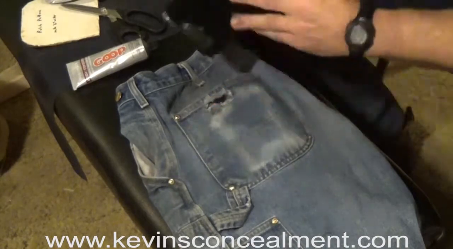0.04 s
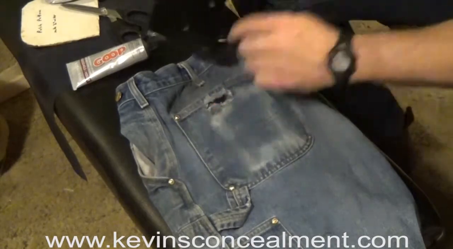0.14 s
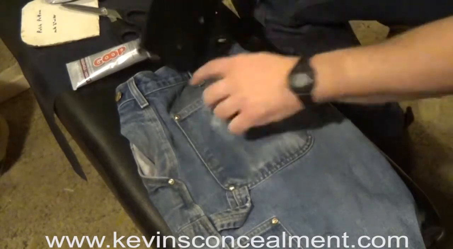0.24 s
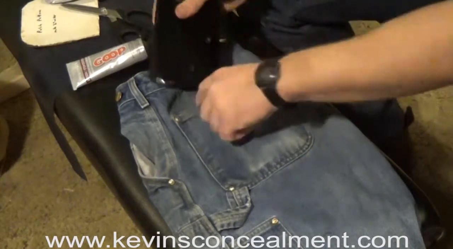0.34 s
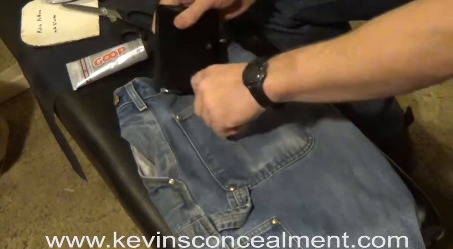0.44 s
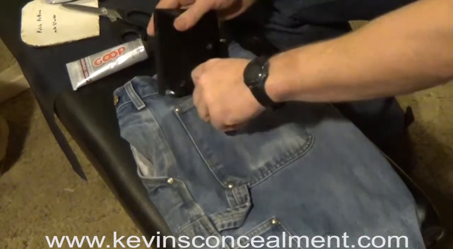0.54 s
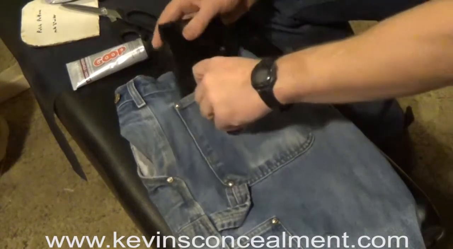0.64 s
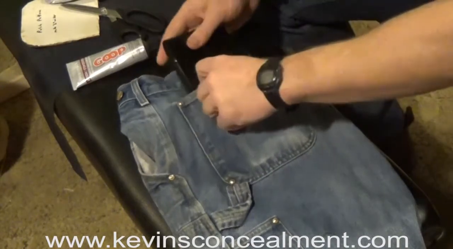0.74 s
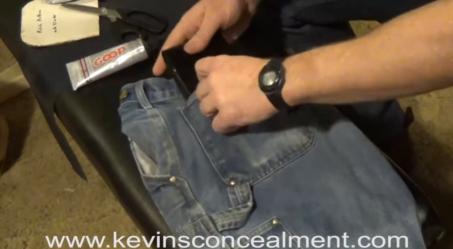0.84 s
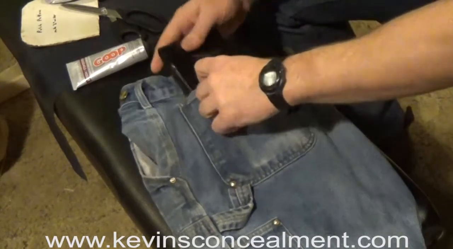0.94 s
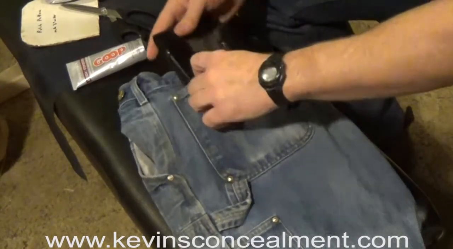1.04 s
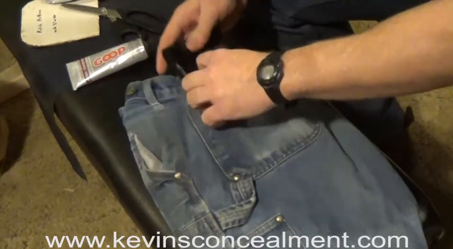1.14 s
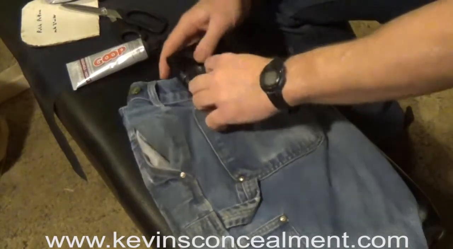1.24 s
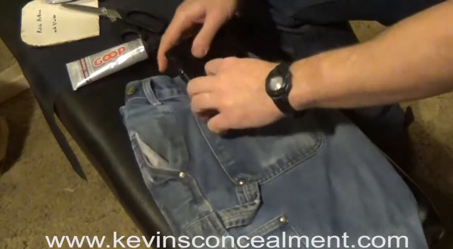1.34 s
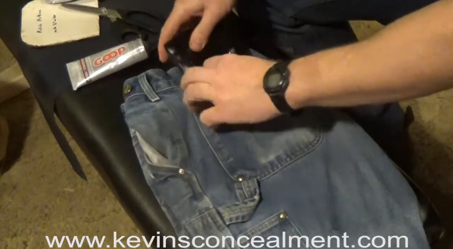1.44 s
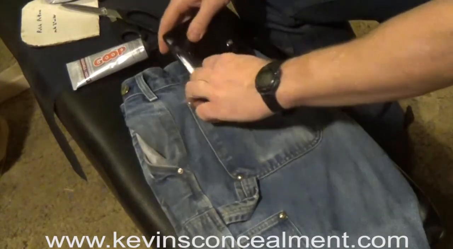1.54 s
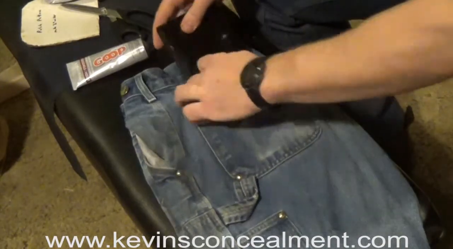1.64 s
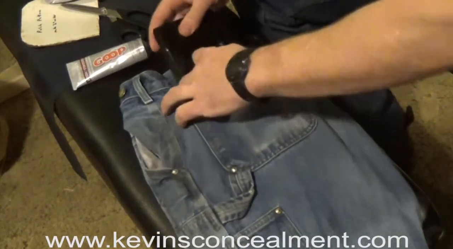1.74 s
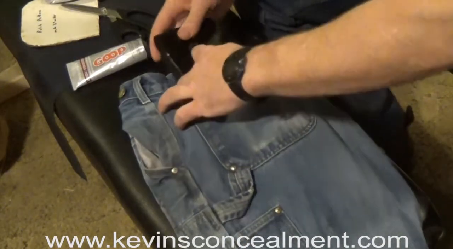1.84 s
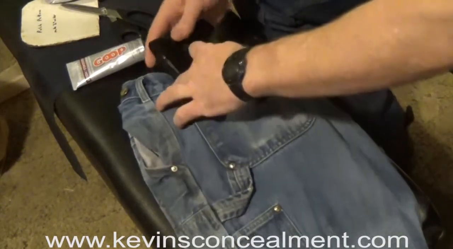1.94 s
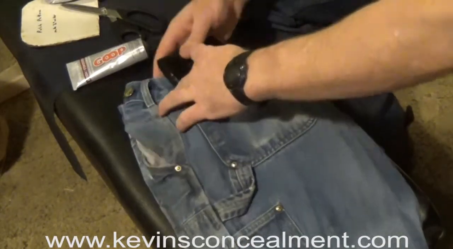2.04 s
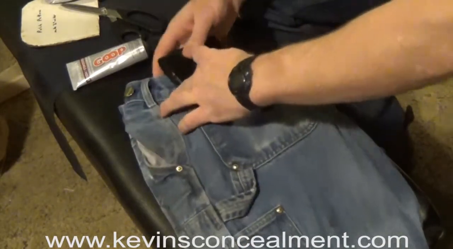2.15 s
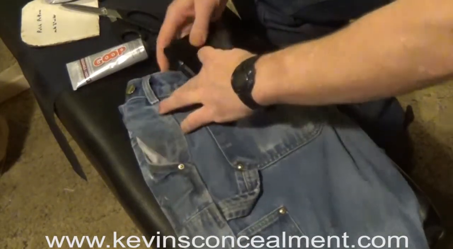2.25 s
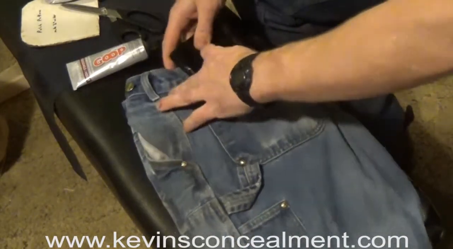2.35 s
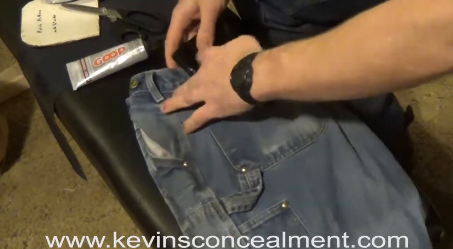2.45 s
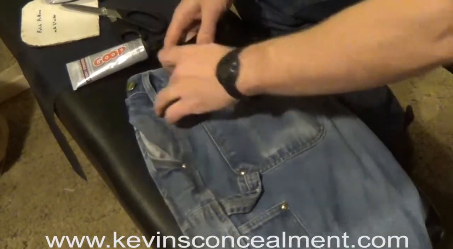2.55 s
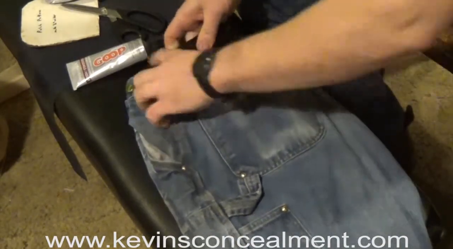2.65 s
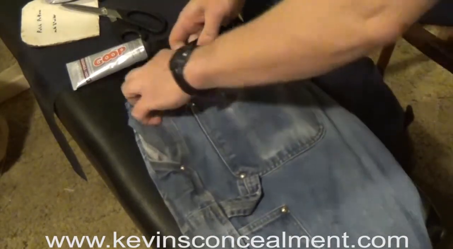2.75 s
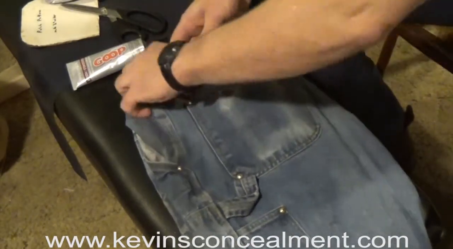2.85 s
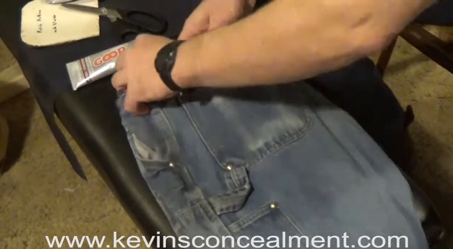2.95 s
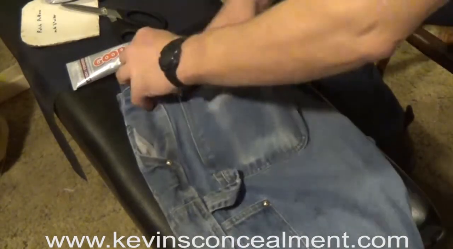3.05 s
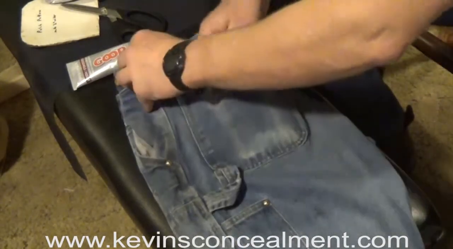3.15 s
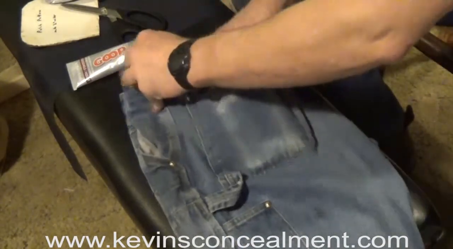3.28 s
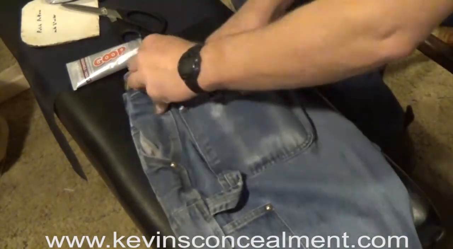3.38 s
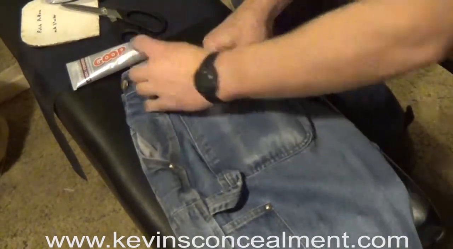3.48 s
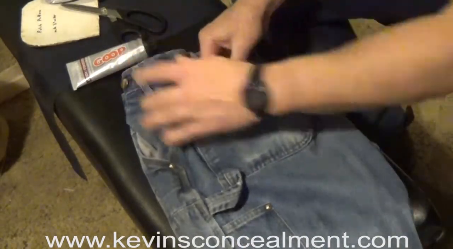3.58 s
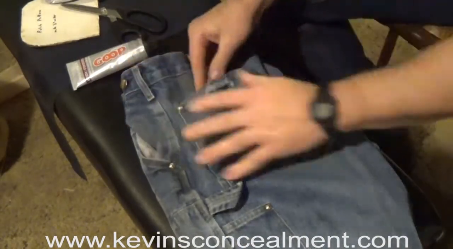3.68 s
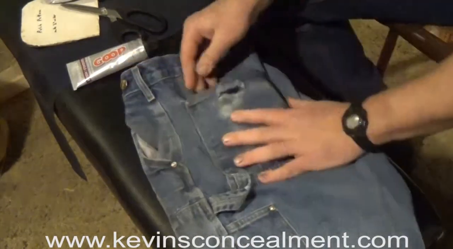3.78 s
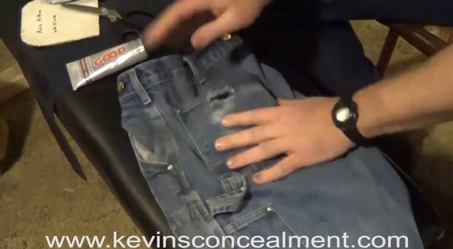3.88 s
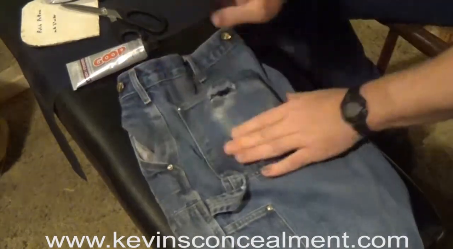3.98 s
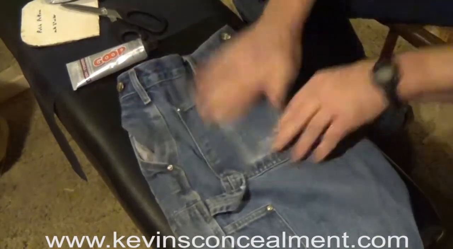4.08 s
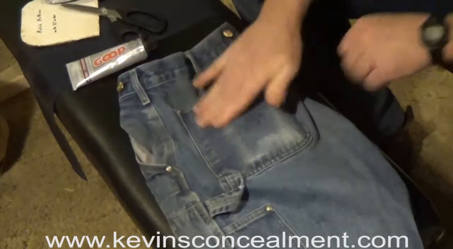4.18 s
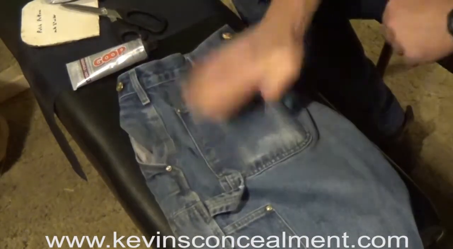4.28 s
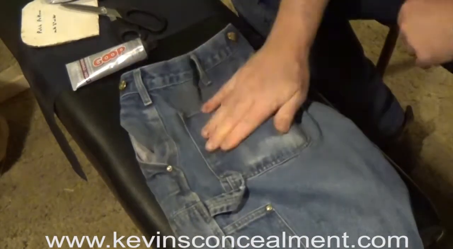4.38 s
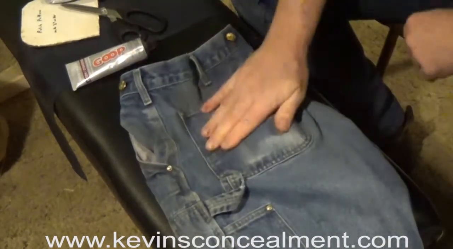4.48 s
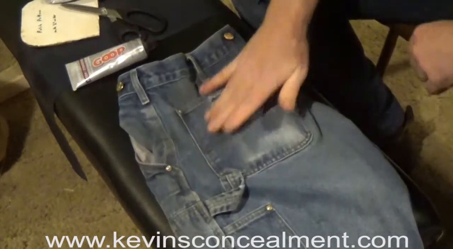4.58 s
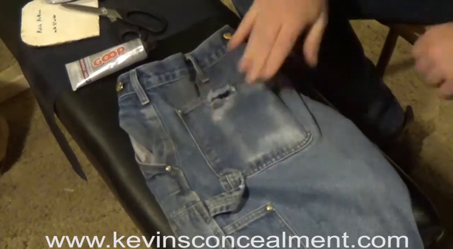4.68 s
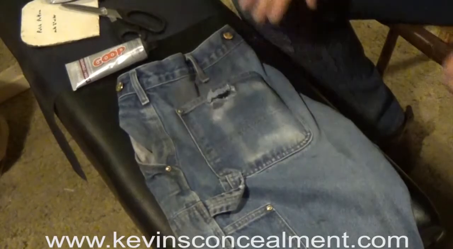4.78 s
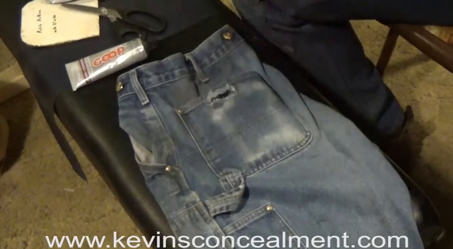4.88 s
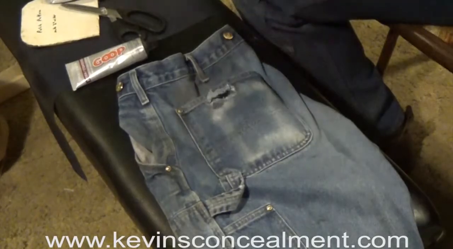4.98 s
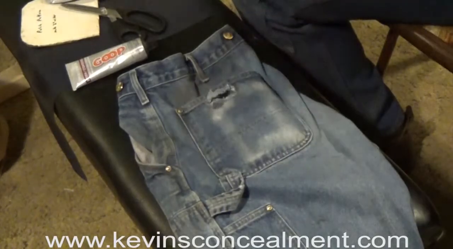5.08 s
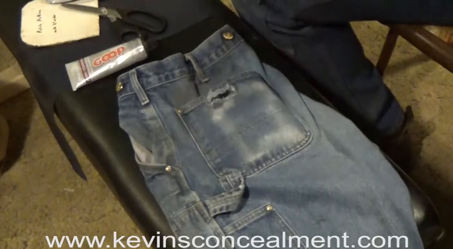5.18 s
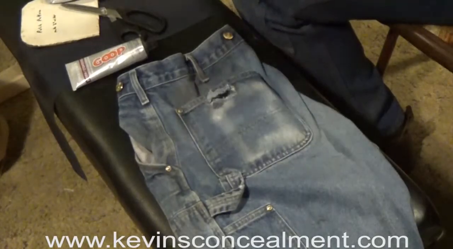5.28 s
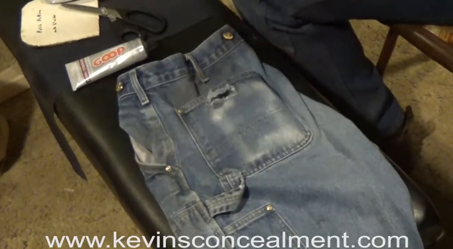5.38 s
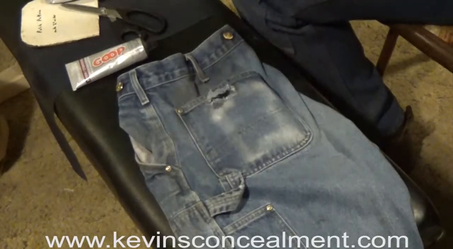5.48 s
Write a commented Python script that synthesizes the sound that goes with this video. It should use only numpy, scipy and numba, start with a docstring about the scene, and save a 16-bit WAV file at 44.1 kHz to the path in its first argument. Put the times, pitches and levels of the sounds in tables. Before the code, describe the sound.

Close up in a small, quiet room, denim rustles in short, uneven pushes while a leather holster knocks lightly and creaks as it is worked into place. A sudden snap follows, then two loud, quick palm pats on the fabric. A soft swish of skin over cloth and a couple of faint taps finish it, over low room hiss.

```python
"""Holster into a waistband

Hands work a leather holster into jeans lying on a padded table, close to a camcorder in a small room.
Denim rubs and crinkles, leather taps and creaks; the holster snaps into place, then a flat hand pats
the cloth twice and brushes away. The room rings briefly over a faint drone and hiss."""
import sys
import numpy as np
from scipy import signal
from scipy.fft import rfft, irfft, next_fast_len
from scipy.io import wavfile
from scipy.ndimage import uniform_filter1d, minimum_filter1d
from numba import njit

SR = 44100
rng = np.random.default_rng(int(sys.argv[2]) if len(sys.argv) > 2 else 0)


def dump(signal):
    """Clip the signal to [-1, 1] and save it as 16-bit WAV at the path in sys.argv[1]."""
    limited = np.clip(np.atleast_2d(signal).T, -1, 1)
    pcm = np.round(limited * 32767).astype(np.int16)
    wavfile.write(sys.argv[1], SR, pcm)


N = 243541
TIME = np.arange(N) / SR

# dull rub of denim folds: f/Hz, level/dB
FOLD_SPECTRUM = [(30, -34), (100, -31), (220, -4), (380, 0.5), (700, 5), (1500, 2.5), (2500, -4.5),
                 (4500, -6.5), (10000, -67.5)]
# bright hiss of the weave: f/Hz, level/dB
WEAVE_SPECTRUM = [(200, -53), (700, -3.5), (1500, 2.5), (3400, 3.5), (6600, 0.5), (7800, -7), (11000, -9),
                  (15500, -22)]


def undb(db):
    """Decibels to gain."""
    return 10 ** (np.asarray(db) / 20)


def unit_rms(x):
    """Scale to rms 1."""
    return x / np.sqrt(np.mean(x ** 2))


def unit_energy(x):
    """Scale to energy 1."""
    return x / np.sqrt(np.sum(x ** 2))


def at_hz(points, hz):
    """Read (f/Hz, value) points on a log-frequency axis."""
    f, value = np.transpose(points)
    return np.interp(np.log(np.maximum(hz, 1)), np.log(f), value)


def colour(x, points):
    """Minimum-phase EQ through (f/Hz, level/dB) points; white noise keeps its level."""
    size = 4096
    gain = undb(at_hz(points, np.fft.rfftfreq(size, 1 / SR)))
    cepstrum = irfft(np.log(gain))
    cepstrum[1:size // 2] *= 2
    cepstrum[size // 2 + 1:] = 0
    impulse = unit_energy(irfft(np.exp(rfft(cepstrum))))
    return signal.fftconvolve(x, impulse)[:len(x)]


def resonate(x, hz, q):
    """One band-pass resonance."""
    return signal.lfilter(*signal.iirpeak(hz, q, fs=SR), x)


def fade(t, t60):
    """Exponential decay by 60 dB in t60."""
    return np.exp(-np.log(1000) * t / t60)


def wander(rate):
    """Random drift that heads for a new value `rate` times a second."""
    knots = rng.standard_normal(4096)
    return 1.61 * np.interp(TIME * rate, np.arange(len(knots)), knots)


def add(track, start_s, sound):
    """Mix a sound into a track."""
    start = int(start_s * SR)
    track[start:start + len(sound)] += sound[:N - start]


def fibres(rate, spread_db):
    """Tiny slips of threads over each other: many small, a few large."""
    slips = rng.random(N) < rate / SR
    sizes = undb(spread_db * np.minimum(rng.exponential(size=N), 5))
    return unit_rms(slips * sizes * rng.choice([-1, 1], N))


def snap(t, t60):
    """A short burst of slips with an even spectrum; energy 1."""
    spectrum = rfft(rng.standard_normal(len(t)) * fade(t, t60))
    whitened = irfft(spectrum / np.abs(spectrum), len(t))
    return unit_energy(whitened * fade(t, 2 * t60))


def room_tone():
    """Steady air and hiss as mid and side; a faint, wavering drone comes in near the end."""
    # still air of the room: f/Hz, level/dB
    air_spectrum = [(25, -16), (50, -30), (80, -0.5), (130, -7.5), (250, -3.5), (335, 3.5), (450, -2.5),
                    (680, -2.5), (1400, -8), (3500, -8.5), (4500, -12.5), (6300, -12.5), (8500, -16.5),
                    (15500, -22.5)]
    # swell of the drone: t/s, level/dB
    drone_swell = [(4.4, -92), (4.62, -73), (5.1, -73), (5.4, -79)]
    mid, side = (undb(-61.5) * colour(rng.standard_normal(N), air_spectrum) for _ in range(2))
    drone_hz = 145 + 2.37 * wander(rate=6.5)
    drone_db = np.interp(TIME, *np.transpose(drone_swell)) + wander(rate=16)
    drone = unit_rms(np.sin(2 * np.pi * np.cumsum(drone_hz) / SR)) * undb(drone_db)
    return mid + drone, 1.4 * side


def reflections():
    """Impulse response of near walls: dense echoes, with the bass lasting longest."""
    # room decay: f/Hz, t60/s
    decay_times = [(150, 0.45), (400, 0.25), (1000, 0.28), (2700, 0.25), (7000, 0.17), (14000, 0.21)]
    t = np.arange(SR // 2) / SR
    noise_spectrum = rfft(rng.standard_normal(len(t)))
    hz = np.fft.rfftfreq(len(t), 1 / SR)
    centres = np.geomspace(125, 16000, 8)
    tail = 0
    for centre, band in zip(centres, np.eye(len(centres))):
        share = at_hz(np.c_[centres, band], hz)
        octave = irfft(noise_spectrum * share, len(t))
        tail = tail + octave * fade(t, at_hz(decay_times, centre))
    onset = np.clip((t - .002) / .0026, 0, 1)
    return unit_energy(tail * onset)


def echoes(dry):
    """The point of contact wanders over the cloth, so the sound passes between two echo patterns."""
    place = 2 * np.pi * 14 * TIME + wander(rate=20)
    shares = np.cos(place), np.sin(place)
    return sum(signal.fftconvolve(dry * share, reflections())[:N] for share in shares)


def room(dry):
    """Mid and side at the microphone: the hands a little to the right, the echoes from all round."""
    # resonances of table and room: f/Hz, level/dB
    modes = [(240, 1.5), (414, 6), (496, -6.5), (610, -2), (690, 4), (964, 2.5)]
    t = np.arange(SR // 2) / SR
    ring = sum(undb(db) * np.cos(2 * np.pi * hz * t) for hz, db in modes) * fade(t, t60=.21)
    mid = .75 * dry + undb(-61) * signal.fftconvolve(dry, ring)[:N]
    # sound reaches the right port first, so part of the side signal lags by a quarter cycle
    lagging = signal.hilbert(mid, next_fast_len(N))[:N].imag
    side = lagging - .45 * mid
    return mid + undb(-9.5) * echoes(dry), side + undb(-7.5) * echoes(dry)


def stroke_speed(peak_s, rise, fall):
    """One push of the cloth gathers and dies away: 7.5 dB down at one rise or fall time from its peak."""
    away = np.maximum((peak_s - TIME) / rise, (TIME - peak_s) / fall)
    return undb(-7.5 * np.minimum(away, 10) ** 1.75)  # exponent 1 = pointed, 2 = bell


def denim_rustle():
    """Folds catch and let go in coarse slips, while the weave gives a fine hiss."""
    # pushes and pulls of the cloth: peak t/s, rise/s, fall/s, fold rub/dB, weave hiss/dB
    strokes = [ (0.005, 0.022, 0.023, -43, -47), (0.065, 0.056, 0.076, -58, -47),
               (0.43, 0.067, 0.075, -62, -60), (0.735, 0.04, 0.048, -49.5, -53.5),
               (0.84, 0.084, 0.12, -61.5, -59), (1.02, 0.042, 0.057, -54.5, -59),
               (1.135, 0.014, .03, -54, -54), (1.255, 0.062, 0.015, -53.5, -74),
               (1.42, 0.13, 0.081, -56.5, -58), (1.7, 0.16, 0.078, -56, -67),
               (1.885, 0.018, 0.04, -46.5, -54), (2.085, 0.065, 0.015, -51, -58.5),
               (2.198, .008, .04, -47.5, -60), (2.315, 0.077, 0.067, -52.5, -56),
               (2.485, 0.043, 0.11, -58, -57), (2.655, 0.066, 0.053, -56, -62),
               (2.815, 0.081, 0.031, -60.5, -57.5), (2.96, 0.084, .07, -51.5, -55.5),
               (3.055, 0.05, 0.062, -46.5, -52), (3.18, 0.035, 0.04, -56.5, -57.5),
               (3.335, 0.039, 0.038, -48, -50), (3.41, 0.026, 0.065, -56.5, -68),
               (3.521, 0.035, 0.022, -58, -56.5), (3.68, 0.089, 0.037, -56, -56),
               (4.01, 0.04, 0.12, -64.5, -57.5), (4.141, 0.046, 0.022, -66, -47)]
    # hands resting on the cloth never keep quite still, until they let go at 3.75 s
    holding = np.clip((3.75 - TIME) / .1, 0, 1)
    rub_power = (holding * undb(-68)) ** 2
    hiss_power = (holding * undb(-66.5)) ** 2
    for peak_s, rise, fall, rub_db, hiss_db in strokes:
        speed = stroke_speed(peak_s, rise, fall)
        rub_power += (speed * undb(rub_db)) ** 2
        hiss_power += (speed * undb(hiss_db)) ** 2
    grip = undb(.88 * wander(rate=79))
    folds = colour(fibres(rate=1500, spread_db=3), FOLD_SPECTRUM) * np.sqrt(rub_power)
    weave = colour(fibres(rate=5000, spread_db=4), WEAVE_SPECTRUM) * np.sqrt(hiss_power)
    return grip * (folds + weave)


def hand_brushes():
    """Skin skims the weave: a smooth hiss that swells and fades with the speed of the hand."""
    # light sweeps over the cloth: t/s, length/s, hiss centre/Hz, level/dB
    sweeps = [(0.266, 0.069, 8800, -56), (1.106, 0.055, 8000, -56), (4.519, 0.39, 4620, -64),
              (4.84, 0.17, 5170, -56.5), (4.952, 0.091, 4660, -46), (4.989, 0.091, 5000, -54.5),
              (5.33, 0.055, 3500, -62.5)]
    out = np.zeros(N)
    for start_s, length, hz, db in sweeps:
        speed = np.hanning(int(length * SR))
        threads = colour(rng.standard_normal(SR // 2), WEAVE_SPECTRUM)
        hiss = resonate(threads, hz, q=.61)[-len(speed):]
        add(out, start_s, undb(db) * unit_rms(speed * hiss))
    return out


def leather_creaks():
    """Leather sticks and slips for a moment in a narrow, unsteady squeak."""
    # creaks of leather and skin: t/s, length/s, f/Hz, level/dB
    creaks = [(0, 0.021, 1170, -43.5), (0, 0.024, 3020, -46), (0.065, 0.022, 1390, -49),
              (0.107, 0.029, 5670, -54.5), (1.67, 0.016, 4030, -56), (1.869, 0.0065, 4370, -41.5),
              (1.916, 0.014, 6070, -55), (2.638, 0.01, 1570, -43.5), (4.122, 0.03, 2340, -46.5)]
    out = np.zeros(N)
    for start_s, length, hz, db in creaks:
        swell = np.hanning(int(length * SR))
        friction = rng.standard_normal(SR // 8)
        squeak = resonate(resonate(friction, hz, q=4), hz, q=4)[-len(swell):]
        add(out, start_s, undb(db) * unit_rms(swell * squeak))
    return out


def leather_taps():
    """Each touch is a short scuff that excites a damped knock of the leather, with a cloth tick on top."""
    # light touches of leather and fingers: t/s, level/dB, knock f/Hz, tick re knock/dB, scuff t60/s
    touches = [ (0.042, -22, 1450, -9, .02), (0.068, -10.5, 1310, -3, 0.041), (0.551, -34, 1320, -7, 0.015),
               (0.733, -24.5, 725, -16, 0.05), (0.748, -35.5, 716, -3.5, 0.034),
               (1.2405, -27.5, 626, -12, 0.017), (1.393, -24, 604, -11, 0.063),
               (1.633, -26.5, 1410, -11, .01), (1.711, -26.5, 426, -2, .05),
               (1.873, -23, 2480, -0.5, 0.043), (1.882, -23.5, 1410, -25, 0.025),
               (2.034, -21, 1390, -2, 0.049), (2.081, -27, 745, -22, 0.035),
               (2.1932, -20.5, 1700, -10, 0.014), (2.248, -28.5, 1210, -7, 0.017),
               (2.308, -24, 640, -8, 0.048), (2.64, -23.5, 940, -10, 0.018),
               (3.023, -21.5, 1400, -12, 0.05), (3.052, -18.5, 1910, -12, 0.015),
               (3.069, -26, 910, -16, 0.015), (3.084, -23, 666, -4, 0.085), (3.289, -25.5, 795, -9, 0.059),
               (3.313, -19, 600, -18, 0.14), (3.333, -17.5, 1010, -4, 0.019),
               (3.785, -21.5, 1400, -6, 0.072), (4.086, -30, 5000, -10, .013),
               (5.332, -31.5, 593, -23, 0.1), (5.461, -31, 1000, -17, 0.062)]
    out, t = np.zeros(N), np.arange(SR // 8) / SR
    for start_s, db, hz, tick_db, t60 in touches:
        scuff = snap(t, t60)
        knock = unit_energy(resonate(resonate(scuff, hz, q=1.5), hz, q=1.5))
        body = undb(-2) * unit_energy(colour(scuff, FOLD_SPECTRUM))
        tick = undb(tick_db) * unit_energy(colour(scuff, WEAVE_SPECTRUM))
        add(out, start_s, undb(db) * (knock + body + tick))
    return out


def holster_snap_and_pats():
    """A crack at first contact, then the layers of cloth are crushed flat and squeeze out trapped air."""
    # heavy hits: t/s, level/dB, crush re crack/dB, crush t60/s, hardness (palm 0, holster 1), air f/Hz
    hits = [(3.7916, -12, 6.5, 0.032, 0.85, 1170), (3.796, 4.5, -8.5, 0.013, 0.93, 750),
            (4.151, -4.5, -10, 0.06, 0.22, 1310), (4.154, 10, 1.5, 0.2, 0, 1670),
            (4.3649, -6, -5, 0.033, 0.74, 1500), (4.366, 7, 6.5, 0.22, 0, 2300)]
    # smack of the hard holster: f/Hz, level/dB
    holster_spectrum = [(60, -49), (160, -18), (290, -20.5), (400, -2), (560, -11.5), (700, -3),
                        (1150, -0.5), (1700, -8.5), (4200, -6.5), (6500, -15.5), (8500, -25.5),
                        (12000, -25.5), (15500, -42)]
    # smack of a flat palm: f/Hz, level/dB
    palm_spectrum = [(30, -34), (90, -31), (190, -23.5), (240, -6.5), (360, -8.5), (500, 0), (720, -0.5),
                     (1000, -3.5), (1700, -3.5), (3200, -4.5), (4600, -9.5), (6600, -12), (8000, -22),
                     (11500, -27.5), (15000, -50)]
    out, t = np.zeros(N), np.arange(SR // 3) / SR
    for start_s, db, crush_db, t60, hardness, pocket_hz in hits:
        crush = fibres(rate=4000, spread_db=1.5)[:len(t)] * fade(t, t60)
        crack = snap(t, t60=.02 + .025 * hardness)
        push = crack + undb(crush_db) * unit_energy(crush)
        smack = hardness * colour(push, holster_spectrum) + (1 - hardness) * colour(push, palm_spectrum)
        air_pocket = .6 * resonate(smack, pocket_hz, q=3)
        add(out, start_s, undb(db) * (smack + air_pocket))
    return out


def scene():
    """All handling sounds in the room; the stereo image narrows in bass and treble."""
    # stereo width of the microphone: f/Hz, side gain/dB
    stereo_width = [(60, -15), (150, -16.5), (500, -8), (1200, -6), (2400, -8), (4400, -11.5),
                    (8000, -14.5), (13000, -29)]
    handling = denim_rustle() + hand_brushes() + leather_taps() + leather_creaks()
    mid, side = room(handling + holster_snap_and_pats())
    air_mid, air_side = room_tone()
    size = next_fast_len(N)
    side_gain = undb(at_hz(stereo_width, np.fft.rfftfreq(size, 1 / SR)))
    side = irfft(rfft(side + air_side, size) * side_gain, size)[:N]
    return mid + air_mid + np.array([side, -side])


@njit
def follow(x, attack_s, release_s):
    """Envelope follower with separate rise and fall times."""
    out, level = np.empty(len(x)), 0.
    for i in range(len(x)):
        lag_s = attack_s if x[i] > level else release_s
        level += (x[i] - level) / (lag_s * SR)
        out[i] = level
    return out


def record(dry):
    """The camcorder's limiter sees peaks coming and holds down the pats, then the top is cut."""
    threshold_db, cutoff_hz = -11.5, 15800
    envelope = follow(np.abs(dry).max(axis=0), attack_s=.0006, release_s=.025)
    gain = 1 / np.maximum(envelope / undb(threshold_db), 1)
    gain = uniform_filter1d(minimum_filter1d(gain, size=64), size=32)  # smooth look-ahead
    lowpass = signal.ellip(8, .2, 70, cutoff_hz, fs=SR, output="sos")
    return signal.sosfilt(lowpass, dry * gain)


dry = scene()
out = record(dry)
dump(out)
```